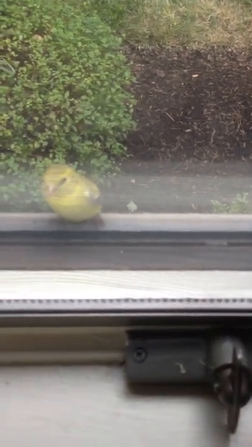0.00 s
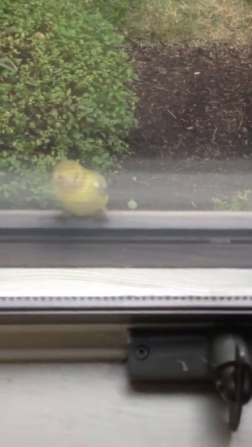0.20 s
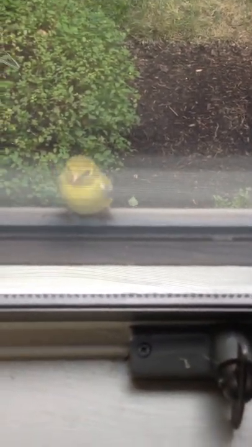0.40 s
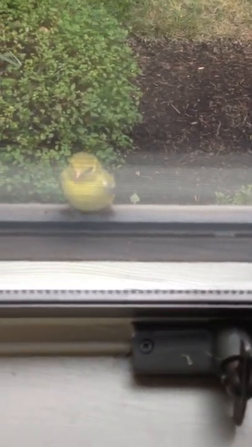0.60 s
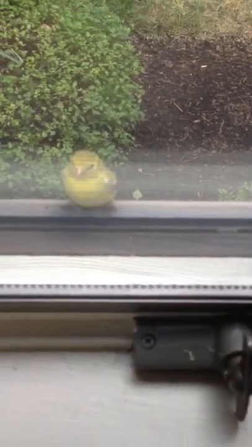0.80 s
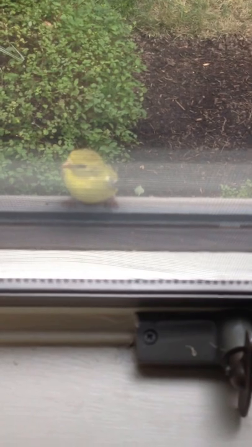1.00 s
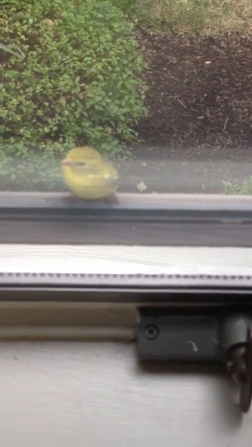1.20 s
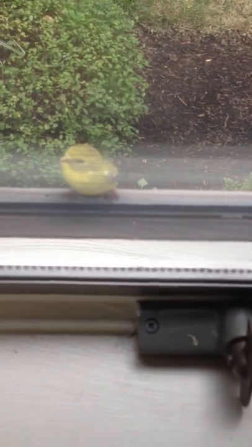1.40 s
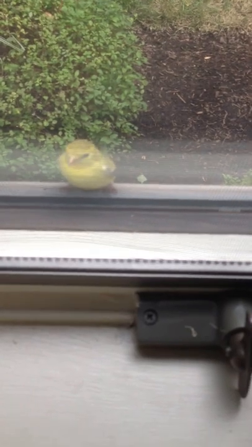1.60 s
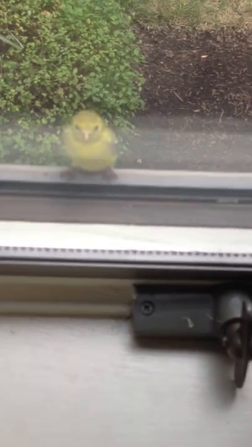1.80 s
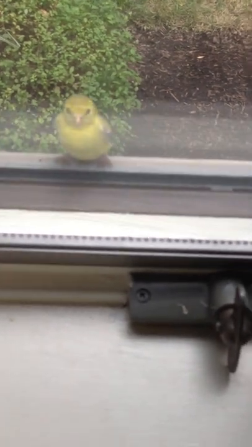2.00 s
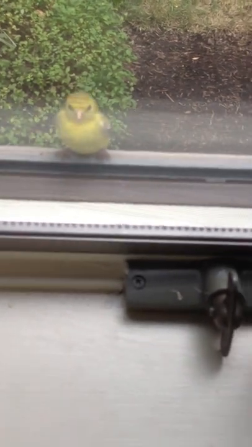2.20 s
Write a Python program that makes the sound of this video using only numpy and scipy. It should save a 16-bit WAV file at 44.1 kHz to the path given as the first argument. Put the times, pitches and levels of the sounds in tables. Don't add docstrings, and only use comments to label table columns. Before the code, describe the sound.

Beak taps on glass, close to the microphone indoors: a rapid burst near the start, over a second of low house hum and faint hiss, then a second short burst finishing with a sharp, bright hit.

```python
import sys
import numpy as np
from scipy import signal
from scipy.fft import rfft, irfft
from scipy.io import wavfile
from scipy.ndimage import uniform_filter1d

SR = 44100
rng = np.random.default_rng(int(sys.argv[2]) if len(sys.argv) > 2 else 0)


def invert_db(level):
    return 10 ** (np.asarray(level, dtype=float) / 20)


def generate_wav(sig):
    pcm = np.round(np.clip(np.atleast_2d(sig).T, -1, 1) * 32767).astype(np.int16)
    wavfile.write(sys.argv[1], SR, pcm)


N = 101430


def at_hz(points, hz):
    f, value = np.array(points).T[:2]
    return np.interp(np.log(hz), np.log(f), value)


def bump(hz, centre_hz, width_hz):
    return 1 / (1 + (2 * (hz - centre_hz) / width_hz) ** 2)


def band_pass(x, low_hz, high_hz):
    return signal.sosfilt(signal.butter(2, [low_hz, high_hz], "band", fs=SR, output="sos"), x)


# [t/s, peak level/dB, body re peak/dB, top re peak/dB, air re peak/dB]
STRIKES = [
    (0.17, -40.5, -5, -7, -16),
    (0.1986, -40, 1, 1, -11),
    (0.2406, -21, -1.5, -3.5, -8.5),
    (0.2735, -22, 3.5, -2.5, 1.5),
    (0.303, -19.5, -1, -2.5, -4.5),
    (0.3353, -22, 1.5, -13.5, -2.5),
    (1.712, -37.5, -6, -1, -18),
    (1.7595, -39, 5, -8, -9),
    (1.7868, -35.5, 1.5, 1, -12),
    (1.8205, -20.5, 6, 11.5, -6),
]
PECK_TRIM_DB = -10
BODY_HZ, TOP_HZ, AIR_HZ = 1940, 5940, 9260
SPOT_CHANGE = .3
REVEAL_S, REVEAL_DB = .0076, -12
FRONT_S = 0.005


def pecks(size=16384):
    hz = np.arange(1, size // 2 + 2) * SR / size
    waves, base, shared = edge_echoes(hz)
    spots = rng.standard_normal((len(STRIKES), len(base)))
    colour, thud = pane_colour(hz), pane_thud(hz)
    low = 1 / (1 + (hz / BODY_HZ) ** 4)
    top = 1 / (1 + (TOP_HZ / hz) ** 6)
    air = 1 / (1 + (AIR_HZ / hz) ** 12)
    length, lag = size * 3 // 4, int(REVEAL_S * SR)
    front = np.exp(-np.arange(length) / SR / FRONT_S)
    glass, cracks = np.zeros((2, N + size))
    for (s, db, body_db, top_db, air_db), spot in zip(STRIKES, spots):
        tone = colour * invert_db(body_db * low + top_db * (top - air) + air_db * air)
        echoes = (base * (shared + SPOT_CHANGE * spot * np.abs(shared))) @ waves
        even = np.sqrt(uniform_filter1d(np.abs(echoes) ** 2, size=36))
        hit = irfft(echoes / even * tone + invert_db(body_db) * thud)[:length]
        hit[lag:] += invert_db(REVEAL_DB) * hit[:-lag]
        hit *= invert_db(db + PECK_TRIM_DB) / np.sqrt(np.mean(hit[:600] ** 2))
        start = int(s * SR)
        glass[start:start + length] += hit
        cracks[start:start + length] += front * hit
    return glass[:N], cracks[:N]


# [f/Hz, t60/s]
RING_TIME = [(200, 0.33), (530, 0.41), (900, 0.39), (1500, 0.28), (2500, 0.12), (5000, 0.064),
             (12000, 0.046)]
# [travel time at 1 kHz t/s, level/dB]
EDGE_ARRIVALS = [(.0005, -9), (.0013, -5), (.0022, -3), (.0034, -4), (.0054, -5), (.0098, 4), (.0118, -3),
                 (.0150, -4), (.0190, -1.5)]
SCATTER_DB, SCATTER_START_S, SCATTER_END_S = -7, .002, .16
SCATTER_FADE_DB = 8


def edge_echoes(hz, count=260):
    edge_s, edge_db = np.array(EDGE_ARRIVALS).T
    scatter_s = SCATTER_START_S + SCATTER_END_S * rng.random(count) ** 1.3
    late_s = np.r_[edge_s, scatter_s][:, None] * np.sqrt(1000 / hz)
    loss = invert_db(-60 * late_s / at_hz(RING_TIME, hz))
    waves = loss * np.exp(-4j * np.pi * late_s * hz)
    base = invert_db(np.r_[edge_db, SCATTER_DB - SCATTER_FADE_DB * scatter_s / SCATTER_END_S])
    shared = np.r_[(-1.) ** np.arange(len(edge_s)), rng.standard_normal(count)]
    return waves, base, shared


# [f/Hz, level/dB per Hz]
PANE_COLOUR = [(230, -13.5), (330, -6), (460, 0.5), (1500, -2.16), (2400, -2.5), (3500, -7), (6500, -7),
               (14000, -16.5)]
# [f/Hz, width/Hz, lift level/dB]
FRAME_MODES = [(349, 24, 1.5), (470, 40, -1.5), (698, 71, -5), (884, 93, -10.5), (1070, 120, 8.5),
               (1204, 46, 2), (1500, 150, -1), (2142, 270, 0.5), (4700, 190, -12.5), (5440, 280, 1.5),
               (8570, 1900, -1), (13260, 890, 1)]


def pane_colour(hz):
    frame = sum(invert_db(db) / (1 + 2j * (hz - f) / width) for f, width, db in FRAME_MODES)
    return invert_db(at_hz(PANE_COLOUR, hz)) * (1 + frame)


THUD_HZ, THUD_WIDTH_HZ, THUD_DB, THUD_LAG_S = 436.5, 79, 1.5, 0.0022


def pane_thud(hz):
    lag = np.exp(-2j * np.pi * hz * THUD_LAG_S)
    return invert_db(THUD_DB) * lag / (1 + 2j * (hz - THUD_HZ) / THUD_WIDTH_HZ)


# [f/Hz, t60/s]
ROOM_TIME = [(250, 0.28), (700, 0.48), (1300, 0.49), (2200, 0.3), (4000, 0.29), (12000, .12)]
# [f/Hz, level/dB]
TAIL_COLOUR = [(250, -35), (450, -25.5), (800, -26.5), (1400, -36.5), (2200, -35.5), (6000, -40.5),
               (12000, -40)]
ROOM_ONSET_S = 0.002


def room(x):
    t, tail = np.arange(SR // 2) / SR, 0
    for low in 177 * 2. ** np.arange(0, 6.1, .5):
        band = band_pass(rng.standard_normal(len(t)), low, np.sqrt(2) * low)
        hz = low * 2 ** .25
        tail = tail + band * invert_db(at_hz(TAIL_COLOUR, hz) - 60 * t / at_hz(ROOM_TIME, hz))
    swell = 1 - np.exp(-t / ROOM_ONSET_S)
    return signal.fftconvolve(x, tail * swell)[:N]


# [f/Hz, level/dB per Hz]
FLOOR_COLOUR = [(40, 1), (80, -12), (130, 1), (250, -9), (420, -8.5), (700, -22), (1500, -25.5),
                (15000, -29.5)]
HUM_DB, HUM_PATCHY_DB = -58.5, 2.5


def room_floor():
    out, edges = 0, 30 * 2 ** np.arange(0, 9.6, .5)
    white = rng.standard_normal((2, N + SR))
    for k, (low, high) in enumerate(zip(edges, np.minimum(edges[1:], .45 * SR))):
        band = band_pass(white[k % 2], low, high)[SR:]
        hz = np.sqrt(low * high)
        waver = np.interp(np.linspace(0, 29, N), np.arange(30), rng.standard_normal(30))
        out = out + band * invert_db(at_hz(FLOOR_COLOUR, hz) + HUM_PATCHY_DB * waver * (hz < 800))
    return invert_db(HUM_DB) * out / np.std(out)


DRONE_HZ, DRONE_WIDTH_HZ, DRONE_DB = 113.6, 8, -68.5


def drone():
    r = np.exp(-np.pi * DRONE_WIDTH_HZ / SR)
    poles = [1, -2 * r * np.cos(2 * np.pi * DRONE_HZ / SR), r * r]
    x = signal.lfilter([1, 0, -1], poles, rng.standard_normal(N + SR))[SR:]
    return invert_db(DRONE_DB) * x / np.std(x)


def scene():
    glass, cracks = pecks()
    return (glass + room(cracks) + room_floor() + drone())[None]


def low_pass(x):
    return signal.sosfilt(signal.butter(12, 16400, fs=SR, output="sos"), x)


MIC_DIP_HZ, MIC_DIP_WIDTH_HZ, MIC_DIP_DB = 10070, 2500, -9.5
LOW_CUT_HZ, LOW_LEAK = 99, 0.031
CUTOFF_HZ = 15550


def record(dry):
    hz = np.fft.rfftfreq(N, 1 / SR)
    x = irfft(rfft(dry) * invert_db(MIC_DIP_DB * bump(hz, MIC_DIP_HZ, MIC_DIP_WIDTH_HZ)), N)
    low_cut = signal.butter(4, LOW_CUT_HZ, "high", fs=SR, output="sos")
    x = LOW_LEAK * x + signal.sosfilt(low_cut, x)
    x = signal.sosfilt(signal.cheby2(12, 30, CUTOFF_HZ, fs=SR, output="sos"), x)
    return low_pass(x)


dry = scene()
out = record(dry)
generate_wav(out)
```